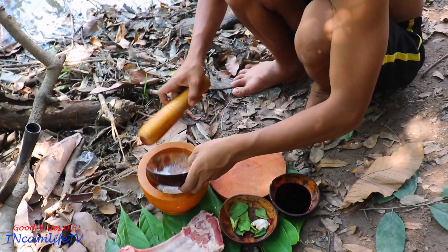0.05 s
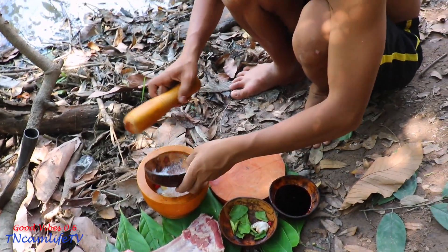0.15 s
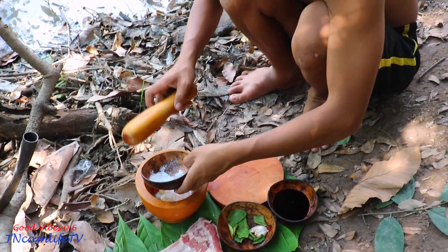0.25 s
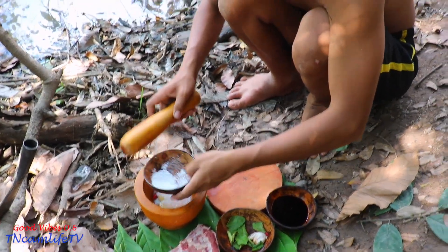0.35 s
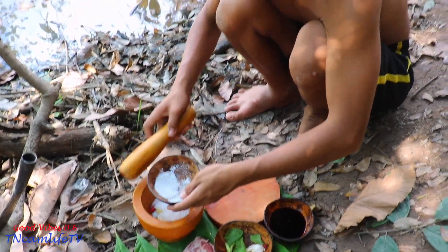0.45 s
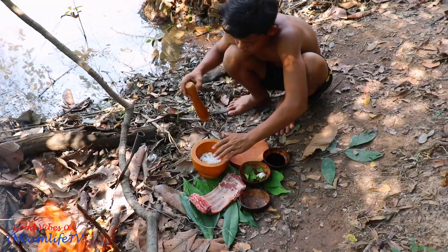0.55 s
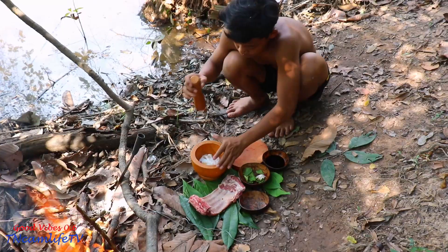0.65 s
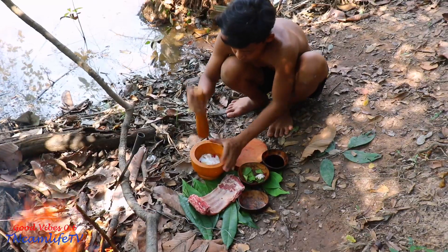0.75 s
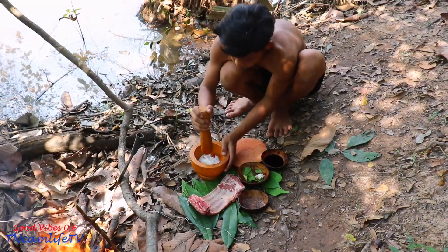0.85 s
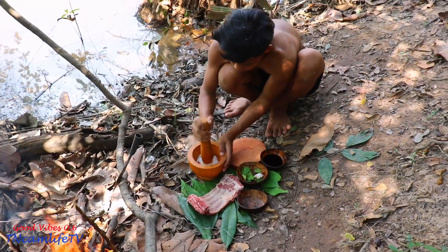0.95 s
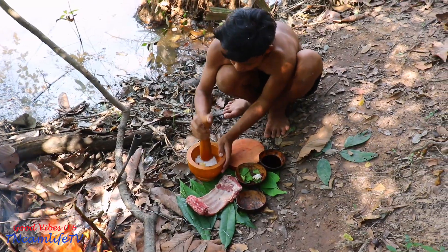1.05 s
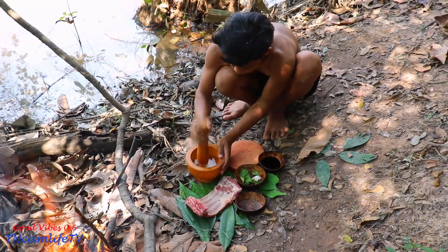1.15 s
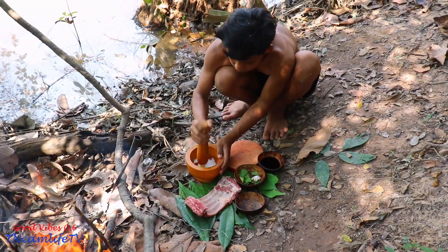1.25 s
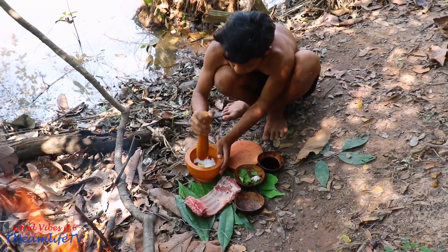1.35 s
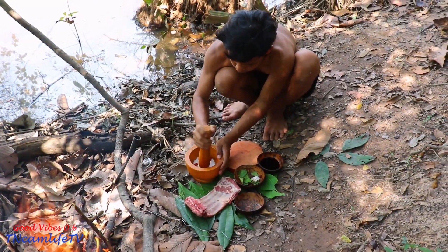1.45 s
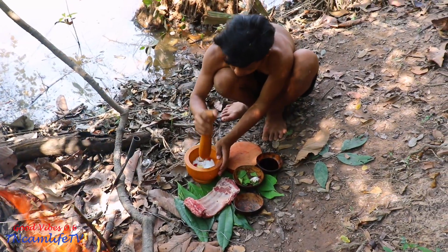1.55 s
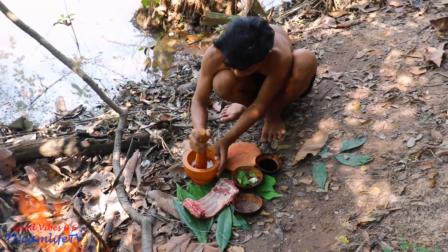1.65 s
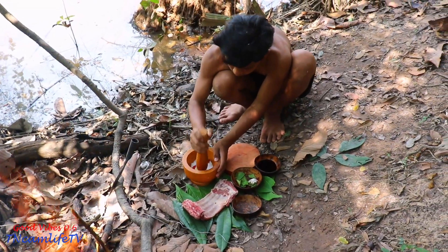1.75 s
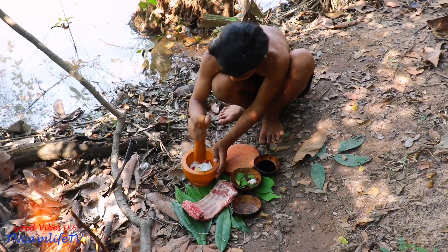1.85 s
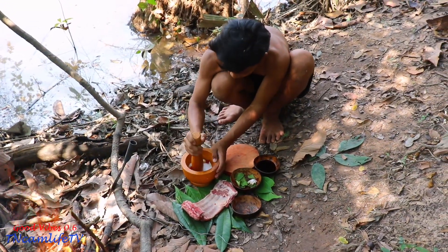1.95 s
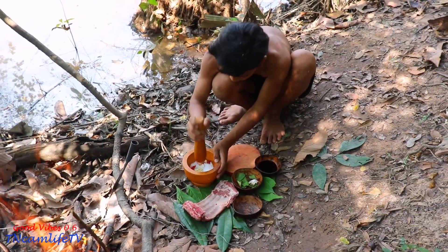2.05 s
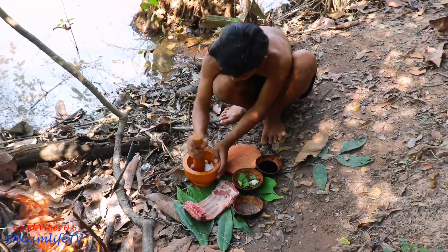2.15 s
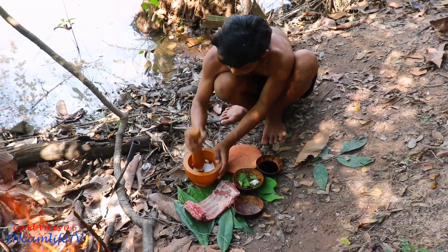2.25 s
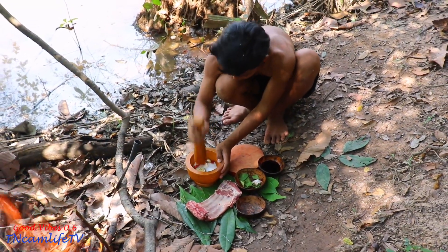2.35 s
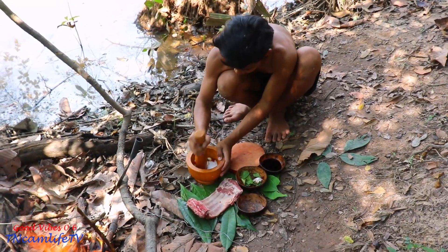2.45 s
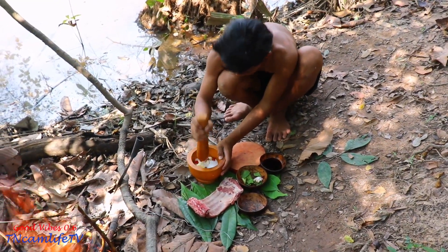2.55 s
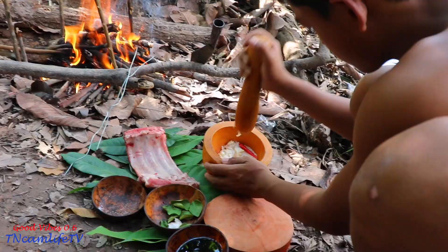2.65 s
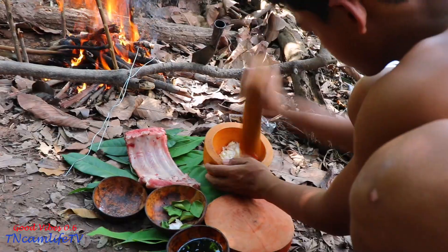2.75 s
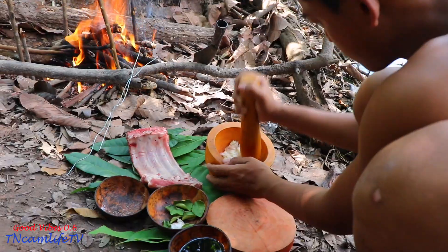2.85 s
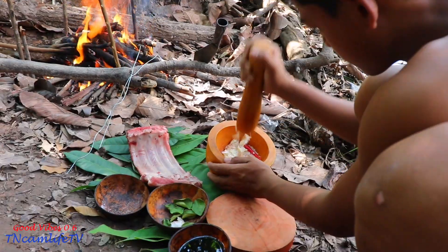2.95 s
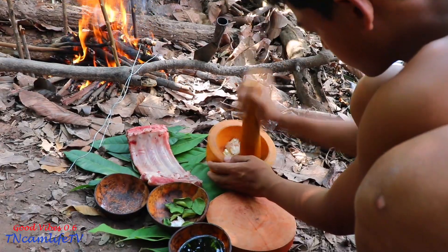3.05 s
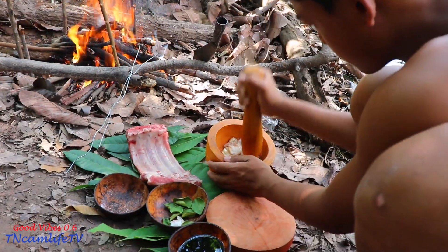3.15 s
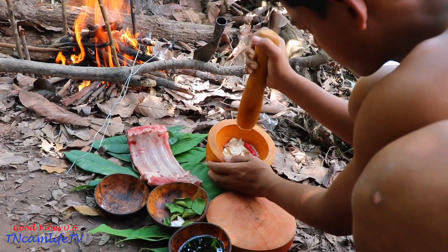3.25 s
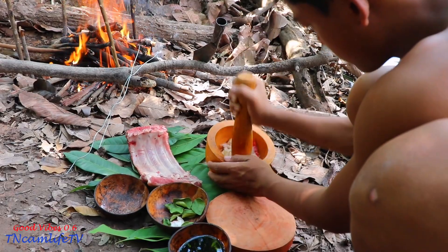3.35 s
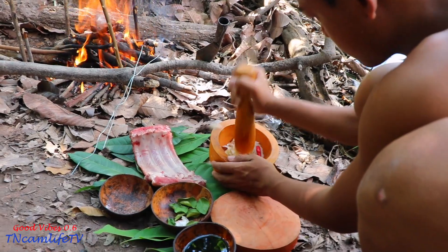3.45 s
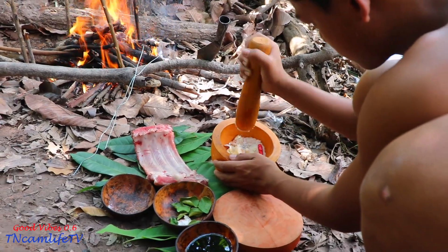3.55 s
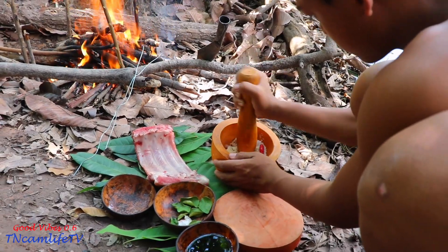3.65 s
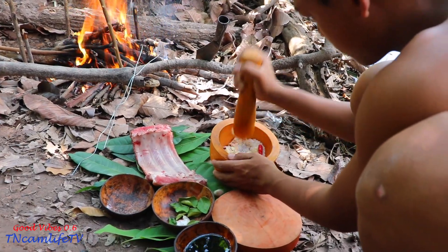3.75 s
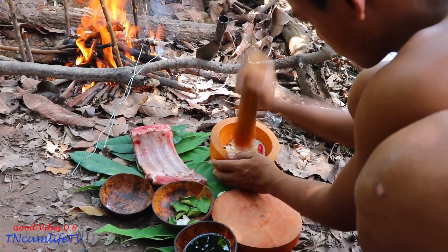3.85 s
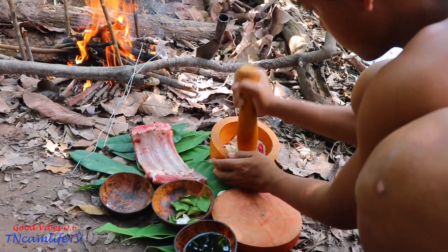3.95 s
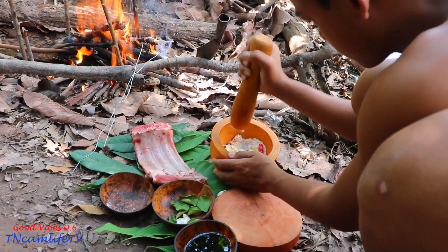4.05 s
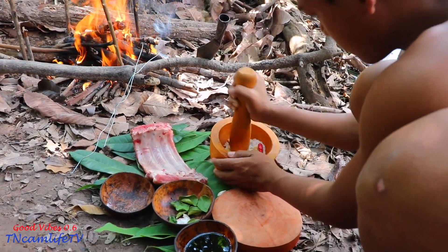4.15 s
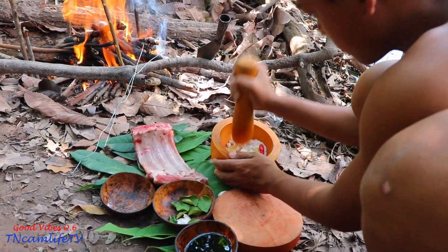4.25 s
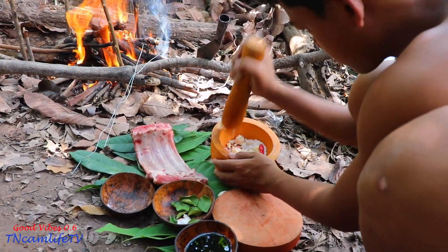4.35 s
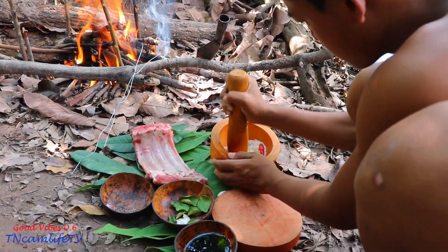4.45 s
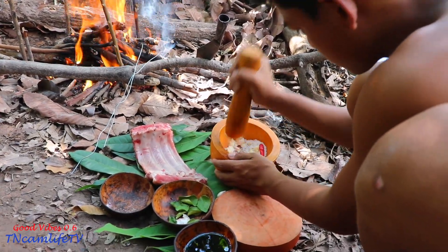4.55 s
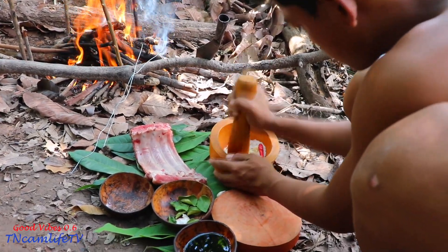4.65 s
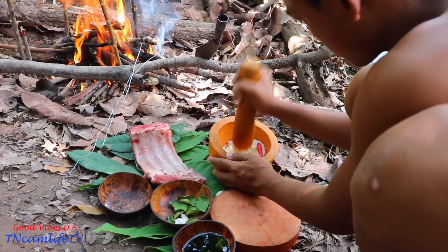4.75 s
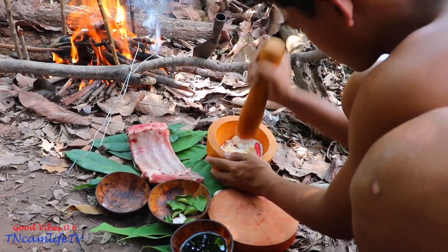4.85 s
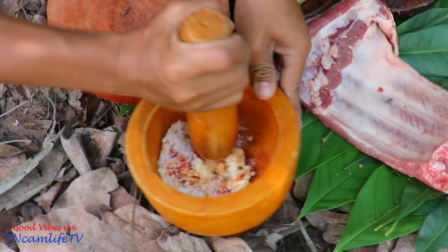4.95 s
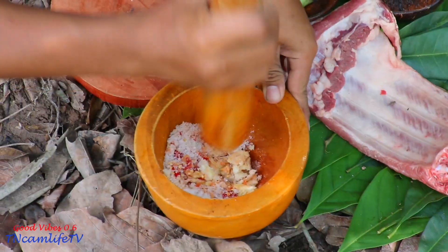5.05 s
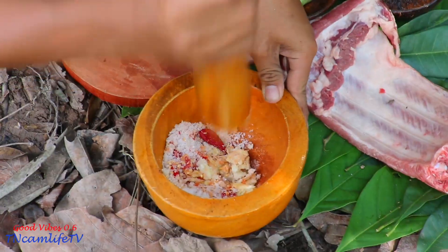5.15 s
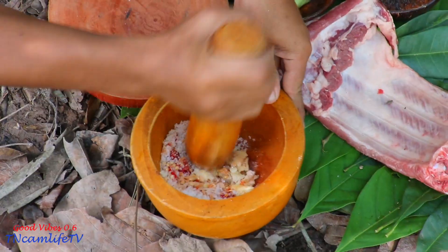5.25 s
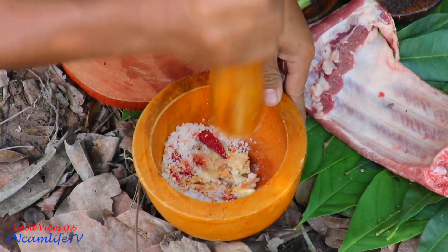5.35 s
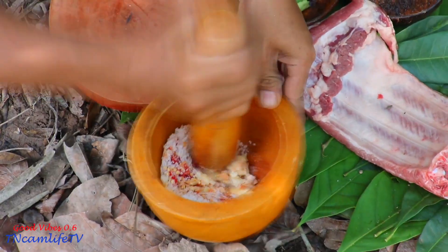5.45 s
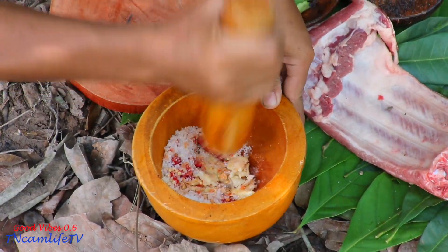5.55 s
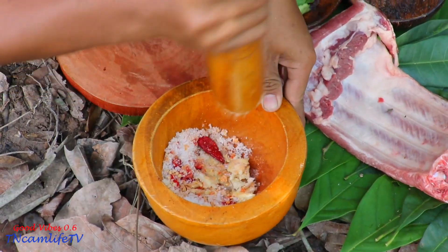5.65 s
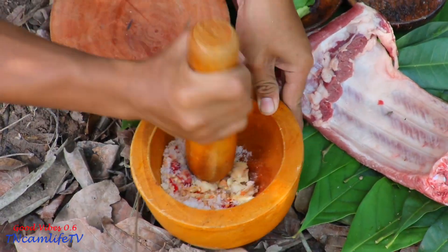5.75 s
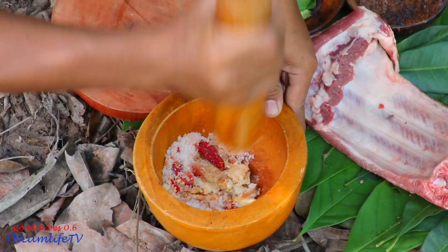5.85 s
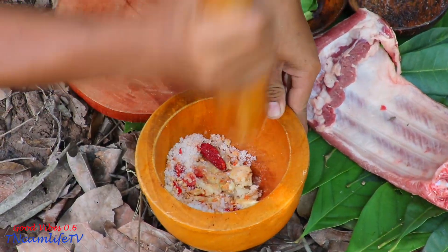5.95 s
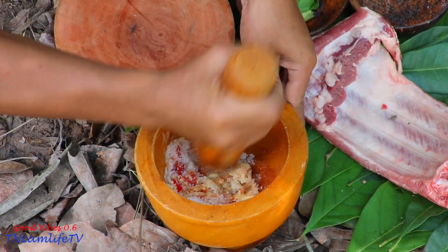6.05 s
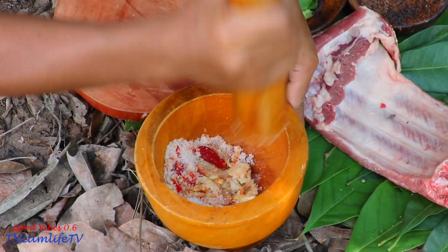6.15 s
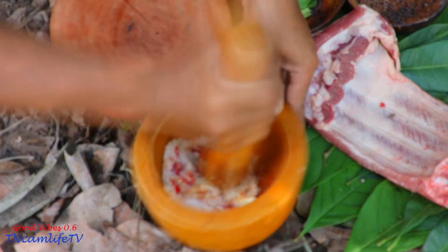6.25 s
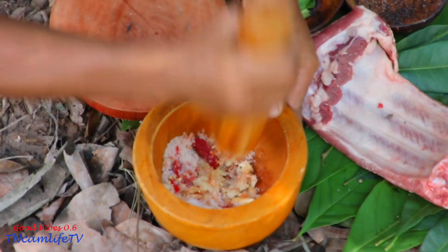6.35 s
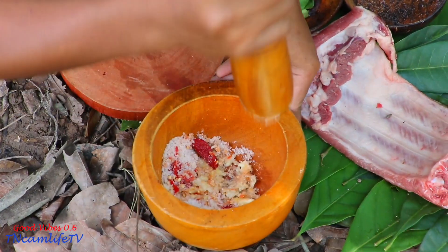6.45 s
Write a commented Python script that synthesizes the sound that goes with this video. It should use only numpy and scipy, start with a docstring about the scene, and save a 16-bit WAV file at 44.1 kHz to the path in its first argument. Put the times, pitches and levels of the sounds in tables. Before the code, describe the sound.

Outdoors, a pestle pounds coarse salt and garlic in a wooden mortar. After a soft scraping start, blows settle at nearly four a second, dry knocks with short hollow ring and gritty crackle. Brief high bird whistles, small ticks, a low fire flutter and leafy hiss lie behind. Three tiny dropouts mark changes of background. The last blows are close, hard and loud; the sound leans left.

```python
"""A wooden pestle pounds salt, garlic and chilli in a wooden mortar: contact forces drive damped modes,
heard as ground thump, grain crack and bowl ring, and swell the crunch of the paste, noise of tiny fractures.
Around it lie ticks (decaying noise bursts), hushes (band noise), bird whistles (gliding sines), a grainy hiss,
and the rustle of a forest floor and a small fire (shaped noise). Background levels step three times, and the
sound drops out for some milliseconds near each step."""
import sys
import numpy as np
from scipy import signal
from scipy.fft import rfft, irfft
from scipy.io import wavfile
from scipy.ndimage import uniform_filter1d, minimum_filter1d, map_coordinates

SR = 44100
rng = np.random.default_rng(int(sys.argv[2]) if len(sys.argv) > 2 else 0)


def transcribe(u):
    """Save the signal u as a 16-bit wav file named by the first command-line argument.

    u: samples, shape (n,) or (channels, n), limited to [-1, 1]; the rate is SR.
    q: integer samples, one column per channel.
    """
    v = np.clip(np.atleast_2d(u).T, -1, 1)
    q = np.round(v * 32767).astype(np.int16)
    wavfile.write(sys.argv[1], SR, q)


def invert_db(level):
    """Linear amplitude ratio for a level in decibels (20 dB per decade), elementwise."""
    return 10 ** (np.asarray(level, dtype=float) / 20)


N = 286621

# pestle blows: (time [s], contact spread [ms], relative ground thump [dB], relative bowl ring [dB],
# relative grain crack [dB], bowl pitch that the landing favours [Hz])
BLOWS = [(0.11, 0.92, -40, -32, -45, 1090), (1.015, .6, -43, -44, -30, 1060),
         (1.044, 9.6, -66, -43, -26.5, 910), (1.268, 2.06, -43, -25, -22.5, 980),
         (1.462, 0.6, -28, -24, -30, 625), (1.502, 2.8, -41, -27.5, -23, 1250),
         (1.745, 0.59, -34, -27, -15, 900), (1.992, 1.1, -41, -26.5, -15.5, 930),
         (2.2402, 1.55, -26, -16, -16, 970), (2.493, 1.56, -25, -19, -17, 845),
         (2.866, 5.7, -42, -40, -32, 940), (2.874, 1.4, -26.5, -23, -13, 1000),
         (3.157, 0.14, -21, -1.5, -14.5, 948), (3.434, 10.3, -39, -29, -15.5, 850),
         (3.716, 10, -24, -27, -17.5, 670), (3.9696, 1.18, -22.5, -20, -16.5, 620),
         (4.214, 4.7, -28.5, -37, -30.5, 800), (4.225, 1.6, -21.5, -20.5, -20, 720),
         (4.499, 12.8, -33.5, -25.5, -23, 800), (4.755, 2.4, -30, -22.5, -20.5, 1320),
         (5.025, 7.7, -32, -8, -12.5, 995), (5.294, 0.23, -62, -1.5, -14.5, 880),
         (5.5572, 0.16, -32, -0.5, -13.5, 832), (5.819, 0.055, -43, -2, -24, 800),
         (6.09, 0.34, -26, 1, -7.5, 1050), (6.36, 1.7, -39, -6, -7.5, 746)]


def rms_one(x):
    """Normalisation: scales the mean power to one."""
    return x / np.sqrt(np.mean(x ** 2) + 1e-20)


def at_hz(points, hz):
    """Interpolation on a logarithmic frequency axis."""
    point_hz, value = np.transpose(points)
    return np.interp(np.log(np.maximum(hz, 1)), np.log(point_hz), value)


def coloured(white, spectrum):
    """Spectral shaping: white noise multiplied by a magnitude response, rms 1."""
    response = invert_db(at_hz(spectrum, np.fft.rfftfreq(N, 1 / SR)))
    return rms_one(irfft(rfft(white) * response, N))


def drift(rate):
    """Slow modulation: random knots, rate of them per second, joined by a smooth curve of rms 1."""
    knots = rng.standard_normal(400)
    return rms_one(map_coordinates(knots, [np.arange(N) / SR * rate]))


def ring(drive, hz, t60):
    """Damped resonance: a unit click sets a sine of height about 1 ringing, 60 dB down after t60 seconds."""
    radius = invert_db(-60 / (t60 * SR))
    angle = 2 * np.pi * min(hz, .45 * SR) / SR
    feedback = [1, -2 * radius * np.cos(angle), radius ** 2]
    return signal.lfilter([0, np.sin(angle)], feedback, drive + 1e-18)


def high_pass(x, order, hz):
    """Butterworth high-pass filtering."""
    return signal.sosfilt(signal.butter(order, hz, "high", fs=SR, output="sos"), x)


def placed(x, left_db):
    """Interaural level difference: left_db is the left level less the right."""
    return x * invert_db(np.array([[left_db / 2], [-left_db / 2]]))


def left_late(x, count):
    """Interaural time difference: a source to the right reaches the left count samples late."""
    return np.array([np.roll(x[0], count), x[1]])


def wide(spectrum):
    """Diffuse-field coherence: stereo noise, alike in the bass, nearly unrelated in the treble."""
    # coherence of the two sides: (frequency [Hz], left-right correlation [1])
    likeness = [(60, 0.85), (240, 0.61), (950, 0.037), (3770, 0.022), (15000, 0.04)]
    alike = np.clip(at_hz(likeness, np.fft.rfftfreq(N, 1 / SR)), 0, 1)
    mid, side = rfft(rng.standard_normal((2, N)))
    pair = np.sqrt(1 + alike) * mid + np.sqrt(1 - alike) * side * [[1], [-1]]
    return coloured(irfft(pair, N), spectrum)


def by_spot(s):
    """Piecewise-constant levels: the columns of the listening spot in use at the given times."""
    # four listening spots: (start [s], deep rumble [dB], flame flutter [dB], background hiss [dB],
    # paste crunch relative to grain crack [dB]), all before slow modulation and placing
    spots = np.array([(0, -58, -57.5, -58, -4), (.526, -58, -61.5, -58.5, -17.5),
                      (2.66, -56.5, -55, -58.5, -18.5), (4.92, -61.5, -58.5, -56.5, -26)])
    return spots[np.searchsorted(spots[1:, 0], s)].T[1:]


def fire():
    """Turbulent combustion noise: deep rumble and flame flutter, modulated separately."""
    # rumble spectrum: (frequency [Hz], relative density [dB per Hz])
    rumble_spectrum = [(12, -20), (20, -15), (70, 0), (147, 1), (225, -2.5), (282, -2.5), (349, -19.5),
                       (600, -16.5), (780, -23), (1320, -120)]
    rumble = wide(rumble_spectrum)
    split_hz = 140.0
    low = signal.sosfilt(signal.butter(3, split_hz, "low", fs=SR, output="sos"), rumble)
    high = high_pass(rumble, 3, split_hz)
    deep_db, flutter_db = by_spot(np.arange(N) / SR)[:2]
    deep = invert_db(deep_db + 2.4 * drift(4.05)) * rms_one(low)
    return deep + invert_db(flutter_db + 1.35 * drift(27.0)) * rms_one(high)


def leaves():
    """Amplitude-modulated noise: the rustle wavers separately in its middle and its top."""
    # rustle spectrum: (frequency [Hz], relative density [dB per Hz])
    rustle_spectrum = [(180, -29), (300, 6), (372, -3), (493, -7.5), (1290, -4.5), (2380, -2.5),
                       (5260, -10.5), (9090, -12.5), (14500, -26.5), (15700, -15)]
    # course of the forest rustle: (time [s], relative level [dB])
    rustle_course = [(0.0, -70), (0.4, -68), (0.56, -56), (1.34, -61), (1.88, -60), (2.48, -62), (2.8, -63),
                     (3.2, -55.5), (3.5, -60.5), (3.87, -54), (4.2, -63.5), (4.85, -59.5), (4.98, -47),
                     (5.07, -56), (5.25, -55.5), (5.57, -50.5), (5.9, -53), (6.5, -48.5)]
    rustle = wide(rustle_spectrum)
    top = high_pass(rustle, 2, 5000.0)
    middle = rustle - top
    wavering = invert_db(0.44 * drift(7.1)) * middle + invert_db(1.3 * drift(8.0) + 1.0 * drift(41.0)) * top
    time, level_db = np.transpose(rustle_course)
    return invert_db(np.interp(np.arange(N) / SR, time, level_db)) * wavering


def grit(spectrum, per_s, size_db, width):
    """Poisson shot noise: dense tiny clicks, uneven in size, scattered between left and right."""
    sizes = invert_db(size_db * np.minimum(rng.exponential(1, (2, N)), 4))
    signs = rng.choice([-1, 1], (2, N))
    clicks = sizes * signs * (rng.random((2, N)) < per_s / SR)
    near, scattered = coloured(clicks, spectrum)
    return near + width * scattered * [[1], [-1]]


def background_hiss():
    """Modulated shot noise: a grainy background hiss goes on throughout."""
    # spectrum of the background hiss: (frequency [Hz], relative density [dB per Hz])
    hiss_spectrum = [(180, -34), (300, -15), (348, 0), (527, -2.5), (572, -3.5), (1000, -5.5),
                     (4170, -11.5), (9710, -13), (15700, -21)]
    hiss_level = invert_db(by_spot(np.arange(N) / SR)[2] + 0.83 * drift(23.0))
    return hiss_level * grit(hiss_spectrum, per_s=7000.0, size_db=4.0, width=0.97)


def birds(waver=.005, breath=0.52, echo_db=-6.0):
    """Frequency modulation and scattering: distant whistles glide and flutter, and trees blur them with echoes.
    waver is the relative pitch spread, breath the share of a note that flutters."""
    # whistled notes: (start [s], end [s], start pitch [Hz], end pitch [Hz], relative level [dB])
    notes = [(.535, 0.63, 2190, 2200, -59), (1.188, 1.217, 3670, 3720, -59),
             (1.383, 1.432, 3760, 3640, -56), (1.59, 1.627, 3700, 3690, -50),
             (1.64, 1.725, 3680, 3750, -54), (1.788, 1.852, 3750, 3660, -53.5),
             (2.054, 2.113, 3600, 3720, -60), (2.197, 2.232, 3730, 3660, -57),
             (2.409, 2.48, 3720, 3740, -56.5), (2.626, 2.645, 3650, 3500, -51.5),
             (5.46, 5.545, 6300, 5080, -57), (6.415, 6.493, 6700, 5200, -54)]
    t, out = np.arange(N) / SR, np.zeros(N)
    flutter, wobble = rms_one(signal.lfilter([1], [1, -1.96, .9604], rng.standard_normal((2, N))))
    for start, end, from_hz, to_hz, level_db in notes:
        on = (t >= start) & (t < end)
        part = (t[on] - start) / (end - start)
        pitch = (from_hz + (to_hz - from_hz) * part) * (1 + waver * wobble[on])
        phase = 2 * np.pi * np.cumsum(pitch) / SR
        swell = np.sqrt(2 * np.sin(np.pi * part)) * (1 - breath + breath * flutter[on])
        out[on] += invert_db(level_db) * swell * np.sin(phase)
    trees = rng.standard_normal((2, 4000)) * invert_db(-60 * np.arange(4000) / SR / 0.1)  # 0.1 s to fall 60 dB
    trees *= invert_db(echo_db) / np.linalg.norm(trees[0])
    return out + signal.fftconvolve(out[None], trees)[:, :N]


def hushes():
    """Band-pass filtering: band noise, swelling and fading."""
    # short swells of band noise, some lingering after blows:
    # (start [s], end [s], centre [Hz], width [octaves], relative level [dB])
    swells = [(0.745, 0.813, 5470, 2.5, -52), (1.632, 1.7, 1190, 0.38, -57),
              (1.633, 1.712, 2860, 0.57, -54), (1.666, 1.696, 1840, 0.13, -56),
              (3.643, 3.682, 704, 0.81, -51), (4.782, 4.805, 1950, 2.1, -43.5),
              (6.26, 6.328, 6000, 1.4, -53.5), (2.88, 2.953, 2930, 3.2, -48),
              (4.495, 4.563, 3960, 2.6, -47.5), (6.346, 6.418, 3400, 2.5, -40)]
    t, out, white = np.arange(N) / SR, np.zeros(N), rng.standard_normal(N)
    for start, end, hz, octaves, level_db in swells:
        on = (t >= start) & (t < end)
        edges = np.clip(hz * 2 ** (max(octaves, .05) * np.array([-.5, .5])), 20, .45 * SR)
        band = signal.sosfilt(signal.butter(2, edges, "band", fs=SR, output="sos"), white[on])
        envelope = np.sin(np.pi * (t[on] - start) / (end - start)) ** 0.19
        out[on] += invert_db(level_db) * rms_one(band) * envelope
    return out


def ticks(t60=0.023, count=20, faint_db=-44.0, faint_spread_db=4.0):
    """Impulsive excitation: a decaying noise burst with a bright edge drives two short resonances.
    Besides the listed ticks, count fainter ones fall at random."""
    # grains and embers that tick: (time [s], relative peak level [dB], centre [Hz])
    snaps = [(0.2154, -38, 2400), (0.313, -41, 9000), (0.4184, -43, 6100), (1.512, -37, 9000),
             (3.52, -42, 6000), (1.1618, -30, 2570), (1.9333, -28, 3060), (3.2216, -30.5, 2650),
             (3.5996, -35.5, 3620), (3.6089, -35.5, 2070), (3.7645, -24, 2310), (3.8121, -26.5, 2090),
             (3.825, -29, 1960), (3.901, -38, 8800), (4.0577, -30.5, 1960), (4.4204, -38.5, 7600),
             (4.5933, -34, 9400), (4.6444, -34, 3070), (4.7028, -32.5, 7700), (4.786, -32, 2480),
             (5.1627, -37.5, 9900), (5.5033, -35, 5840), (5.875, -37, 1930), (6.1489, -33, 2270),
             (6.273, -33, 3860)]
    size = 1024
    out = np.zeros(N + size)
    when, loud, pitch = rng.random((count, 3)).T
    faint = [when * N / SR, faint_db + faint_spread_db * (2 * loud - 1), 2260.0 * 2 ** (2 * pitch)]
    rows = np.vstack([snaps, np.transpose(faint)])
    bursts = rng.standard_normal((len(rows), size)) * invert_db(-60 * np.arange(size) / SR / t60)
    for (s, peak_db, hz), burst in zip(rows, bursts):
        tick = 0.49 * burst + 0.11 * ring(burst, hz, 10.5 / hz) + 0.32 * ring(burst, 1.71 * hz, 0.99 / hz)
        tick = high_pass(tick, 2, 0.71 * hz)
        at = round(s * SR)
        out[at:at + size] += invert_db(peak_db) * tick / np.abs(tick).max()
    return out[:N]


def paste(rise_s=0.0056, t60=0.14):
    """Granular fracture: the food crunches as the pestle sinks in and settles after."""
    # spectrum of the crunch: (frequency [Hz], relative density [dB per Hz])
    crush_spectrum = [(180, -6.5), (300, -6.5), (567, -11), (742, -8), (2790, -1), (5020, -9),
                      (9180, -11.5), (14900, -24), (15700, -25), (16500, -58)]
    t, power = np.arange(N) / SR, 0
    for blow in BLOWS:
        late = t - blow[0]
        crunch_db = blow[4] + by_spot(blow[0])[3]
        exponent = np.where(late < 0, late / rise_s, -late * np.log(1000) / t60)
        power = power + invert_db(crunch_db) ** 2 * np.exp(2 * exponent)
    crunch_level = np.sqrt(power) * invert_db(1.24 * drift(30.0))
    return crunch_level * grit(crush_spectrum, per_s=5000.0, size_db=3.5, width=0.98)


def contacts(size=4096, clump_db=5.0, push_ms=9.0, push_db=-19.0):
    """Impulse spreading: a sharp hit is one click; a blurred one is a short noisy burst of the same energy.
    Around it lies a fainter, longer push."""
    ms = (np.arange(size) - size // 2) * 1000 / SR
    spread = np.maximum(np.array(BLOWS)[:, 1:2], .05)
    noise = rng.standard_normal((len(BLOWS), 2, size))
    tones = rfft(noise[:, 0] * np.exp(-.5 * (ms / spread) ** 2))
    flat = irfft(tones / (np.abs(tones) + 1e-12), size)  # all frequencies equally strong
    core = flat * np.exp(-.5 * (ms / (1.7 * spread + 0.088)) ** 2)
    # the burst is uneven, in clumps about a millisecond long
    clumps = rms_one(uniform_filter1d(rng.standard_normal(core.shape), size=60))
    core = core * invert_db(clump_db * clumps)
    push = noise[:, 1] * np.exp(-.5 * (ms / push_ms) ** 2)
    core /= np.linalg.norm(core, axis=1, keepdims=True)
    push /= np.linalg.norm(push, axis=1, keepdims=True)
    return core + invert_db(push_db) * push


def struck(forces, modes, level_db, favoured_hz, favour_db, vary_db, side_db):
    """Modal superposition: every blow strikes every mode, hardest near its favoured pitch; modes radiate unevenly."""
    size, out = forces.shape[1], np.zeros((2, N))
    # harder cracks are duller on top: treble tilt in dB per octave above 4 kHz
    tilt_db = -0.41 * (np.array(BLOWS)[:, 4] + 11)
    chance = rng.standard_normal((len(BLOWS), 2, len(modes)))
    for k, (hz, mode_db, t60) in enumerate(modes):
        drive = np.zeros((2, N + size))
        favour = favour_db * np.exp(-.5 * (np.log2(hz / favoured_hz) / 0.2) ** 2)
        mode_levels = level_db + mode_db + favour + tilt_db * max(np.log2(hz / 4000), 0)
        for blow, force, db, (own, lean) in zip(BLOWS, forces, mode_levels, chance[:, :, k]):
            at = round(blow[0] * SR)
            drive[:, at:at + size] += placed(force * invert_db(db + vary_db * own), side_db * lean)
        centred = drive[:, size // 2:N + size // 2]  # the middle of each force falls on its blow
        out += (-1) ** k * ring(centred, hz, t60)
    return high_pass(out, 2, 80.0)


def thump(forces):
    """Low-frequency modal response: the ground takes up the blow."""
    # ground modes: (frequency [Hz], relative level [dB], time to fall 60 dB [s])
    ground_modes = [(119.5, -6, 0.045), (208, -4.5, 0.048), (281, -1, 0.022)]
    levels = np.array(BLOWS)
    return struck(forces, ground_modes, levels[:, 2], levels[:, 5], favour_db=0, vary_db=2.5, side_db=5.0)


def crack(forces):
    """Brittle fracture as short treble modes: each blow favours a random crack pitch."""
    # grain modes: (frequency [Hz], relative level [dB], time to fall 60 dB [s])
    grain_modes = [(1800, -8.5, 0.0066), (2897, -5, 0.0076), (3470, -5.5, 0.0061), (4350, -5.5, 0.0052),
                   (5015, -11, 0.011), (5840, -4, 0.0021), (6880, -4.5, 0.004), (8370, 0.5, 0.0015),
                   (10480, -6, 0.0018), (11960, -8.5, 0.0026), (14800, -20.5, 0.011)]
    low_hz, high_hz = 2050, 5240
    crack_hz = low_hz * (high_hz / low_hz) ** rng.random(len(BLOWS))
    level_db = np.array(BLOWS)[:, 4]
    return struck(forces, grain_modes, level_db, crack_hz, favour_db=7.0, vary_db=1.5, side_db=5.0)


def bowl(forces):
    """Modal resonance of the wooden bowl: the landing of each blow favours modes near one pitch."""
    # bowl modes: (frequency [Hz], relative level [dB], time to fall 60 dB [s]); the last two are a faint, long
    # echo of the ring from the surrounding forest
    bowl_modes = [(428, -12.5, 0.011), (780, -1, 0.011), (1038, -3, 0.0093), (646, -14, 0.0083),
                  (1250, -14, 0.019), (1643, -15, 0.018), (1795, -29, 0.051), (2286, -15.5, 0.036),
                  (2570, -20.5, 0.025), (844, -40.5, 0.17), (966, -40.5, 0.15)]
    levels = np.array(BLOWS)
    return struck(forces, bowl_modes, levels[:, 3], levels[:, 5], favour_db=5.0, vary_db=3.08, side_db=3.0)


def scene():
    """Linear superposition: one set of contact forces drives ground, grains and bowl; the rest is added."""
    forces = contacts()
    forest = placed(fire() + leaves(), -6.5) + placed(birds(), -13.0)
    small = placed(background_hiss(), -2.4) + placed(paste(), -8.5) + placed(ticks() + hushes(), -9.5)
    near = placed(thump(forces), -6.0) + placed(crack(forces), -10.0) + small
    wood = left_late(placed(bowl(forces), -4.0), count=3)
    wood = np.roll(wood, 20, axis=1)  # the bowl answers just after the grains crack
    return forest + left_late(near, count=1) + wood


def band_limit(x):
    """A steep low-pass at the top of the band."""
    return signal.sosfilt(signal.butter(12, 16850, fs=SR, output="sos"), x)


def record(dry):
    """Dynamic compression: loud blows push the gain down, it holds a moment and springs back.
    The level drops out at listed times; peaks are rounded and the top is cut."""
    # dropouts: (silence start [s], silence end [s], depth of a second dip [dB]), edges then smoothed
    dropouts = [(.516, .5362, -16), (2.651, 2.668, -14), (4.915, 4.926, -30)]
    silence_db, dip_after_s, dip_s = -90, .043, .009
    t = np.arange(N) / SR
    envelope = uniform_filter1d(np.abs(dry).max(axis=0), size=128)
    over_db = np.maximum(20 * np.log10(envelope + 1e-9) + 20.0, 0)  # excess above -20 dB
    held_db = -minimum_filter1d(-over_db, size=2001, origin=1000)  # highest excess of the last 45 ms
    gain_db = -.5 * signal.lfilter([.004], [1, -.996], held_db)
    gate = np.ones(N)
    for start, end, depth_db in dropouts:
        gate[(t >= start) & (t < end)] = invert_db(silence_db)
        dip = start + dip_after_s
        gate[(t >= dip) & (t < dip + dip_s)] = invert_db(depth_db)
    levelled = dry * invert_db(gain_db) * uniform_filter1d(gate, size=64)
    rounded = 1.1 * np.tanh(levelled / 1.1)
    mix = signal.sosfilt(signal.cheby2(12, 30, 16100, fs=SR, output="sos"), rounded)
    return band_limit(mix)


dry = scene()
out = record(dry)
transcribe(out)
```